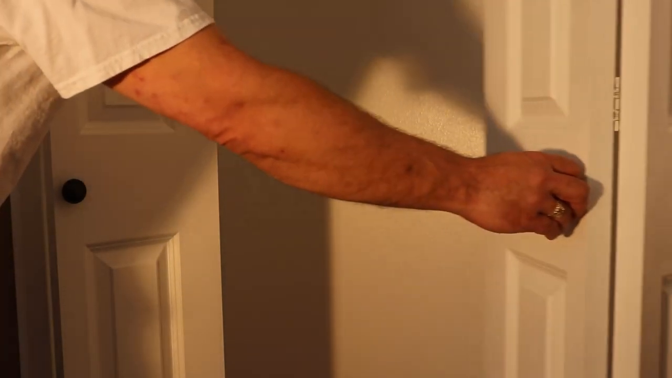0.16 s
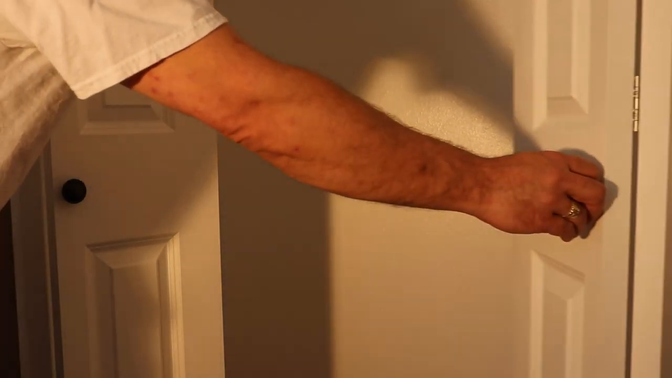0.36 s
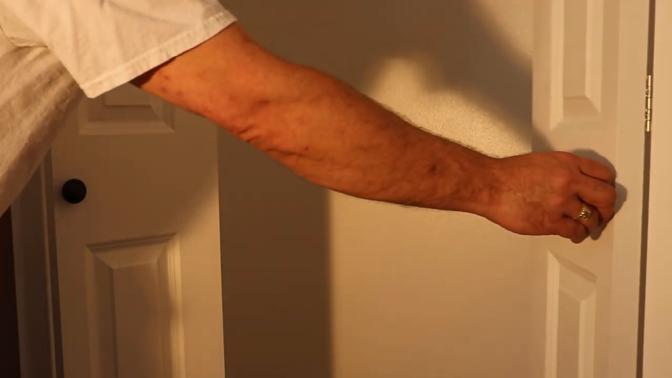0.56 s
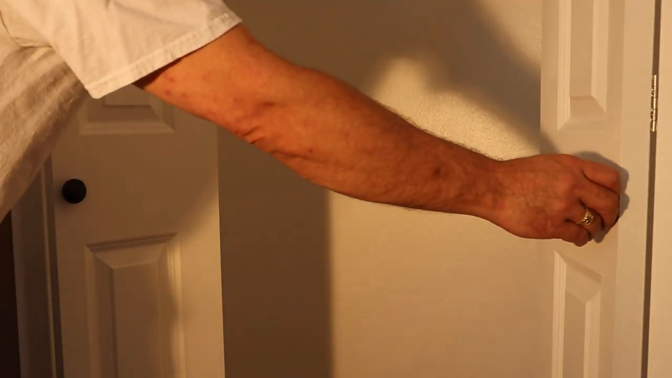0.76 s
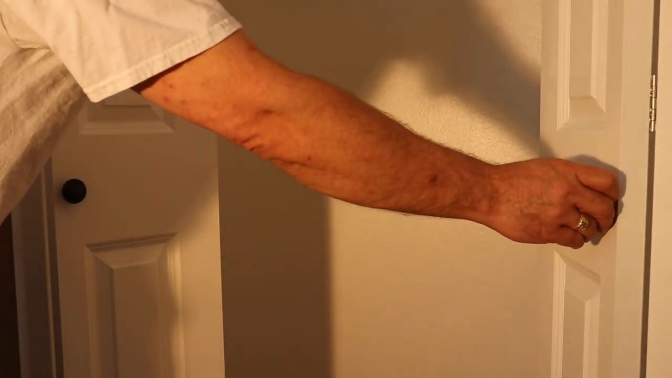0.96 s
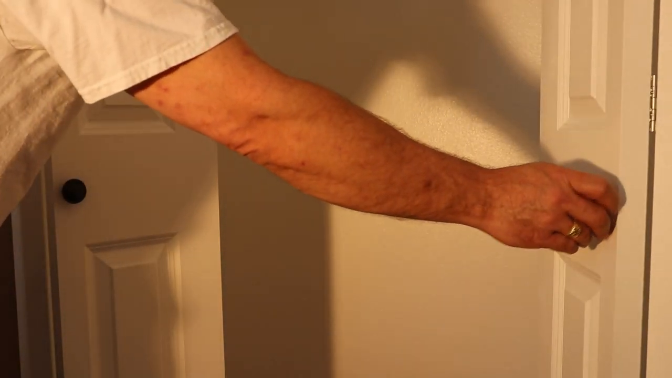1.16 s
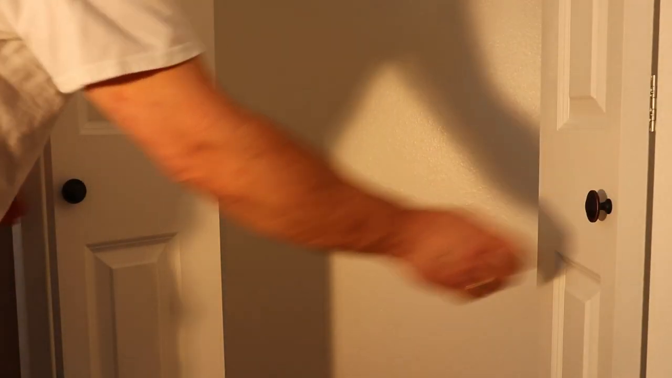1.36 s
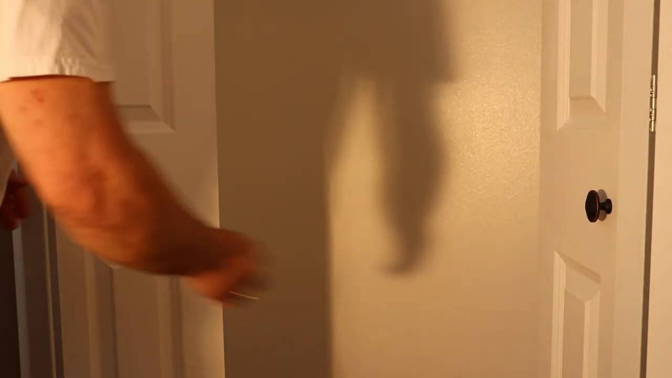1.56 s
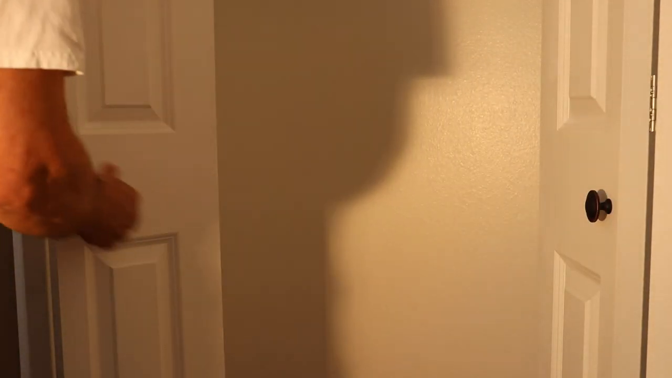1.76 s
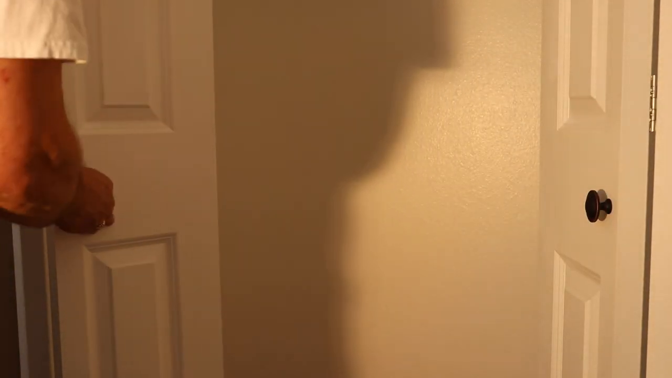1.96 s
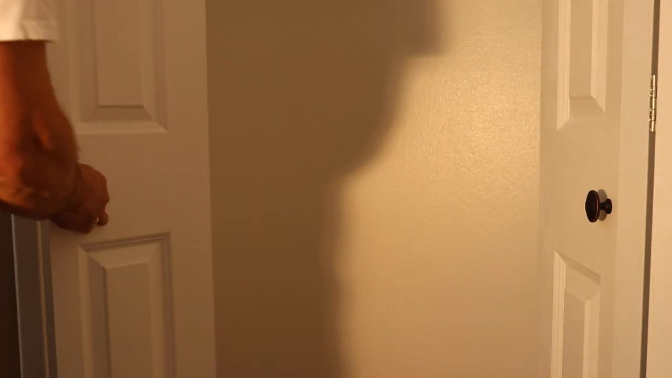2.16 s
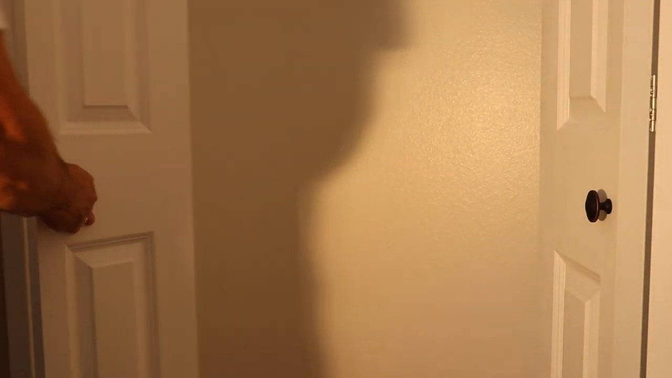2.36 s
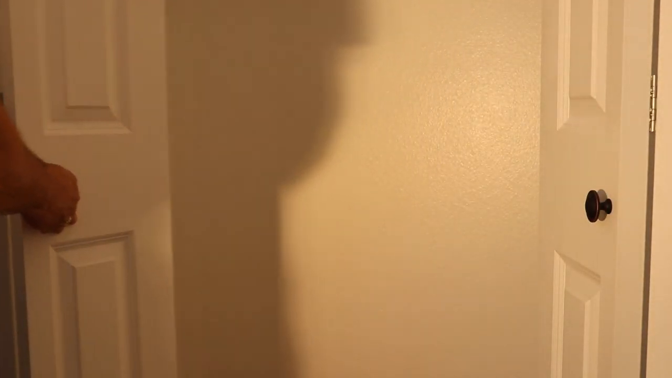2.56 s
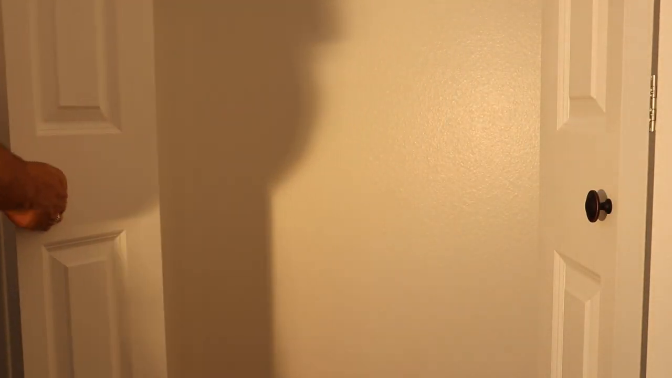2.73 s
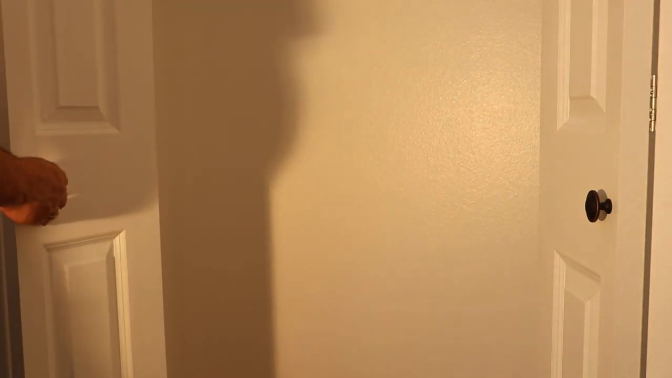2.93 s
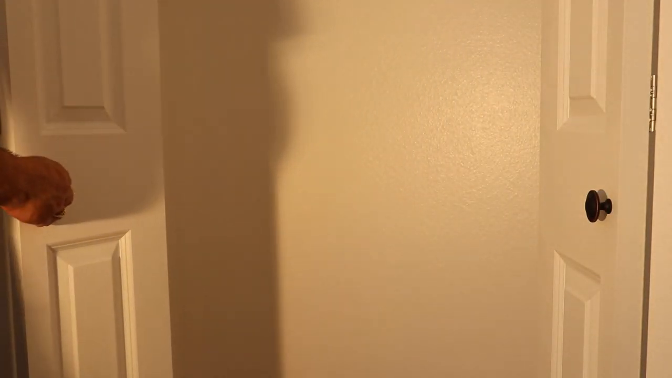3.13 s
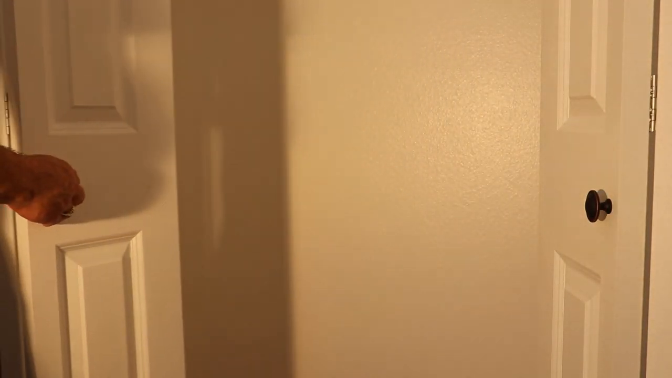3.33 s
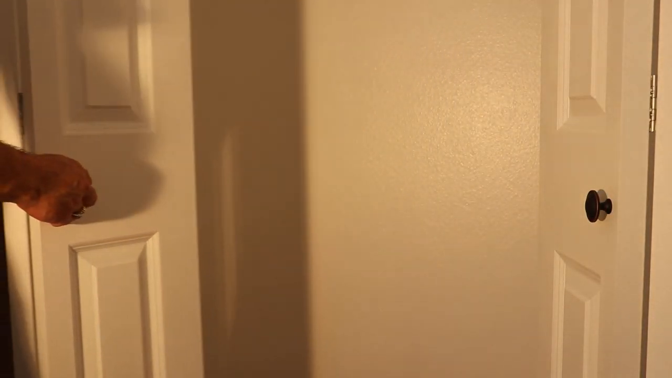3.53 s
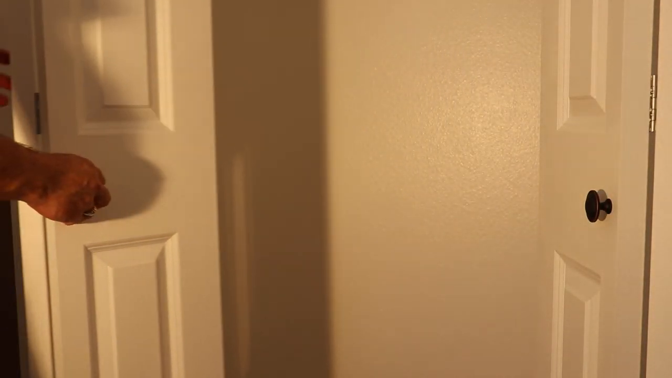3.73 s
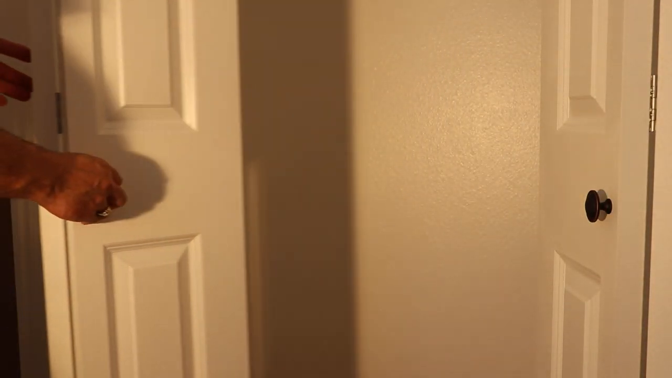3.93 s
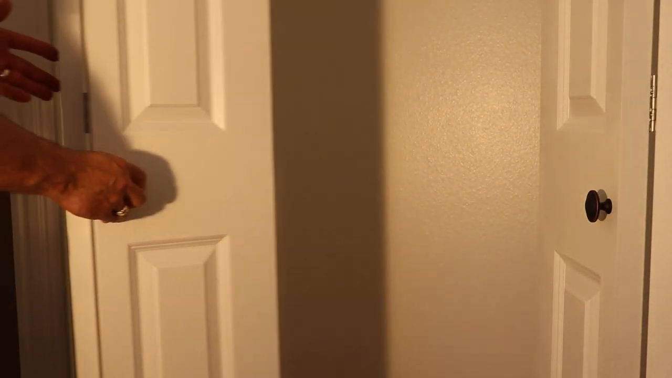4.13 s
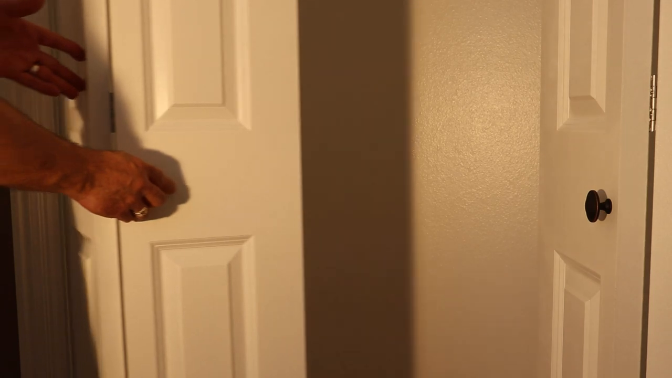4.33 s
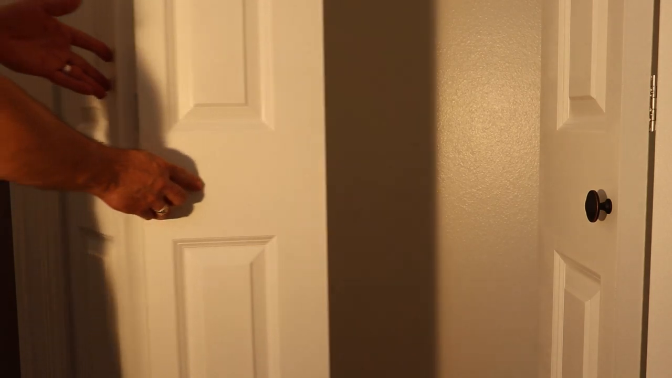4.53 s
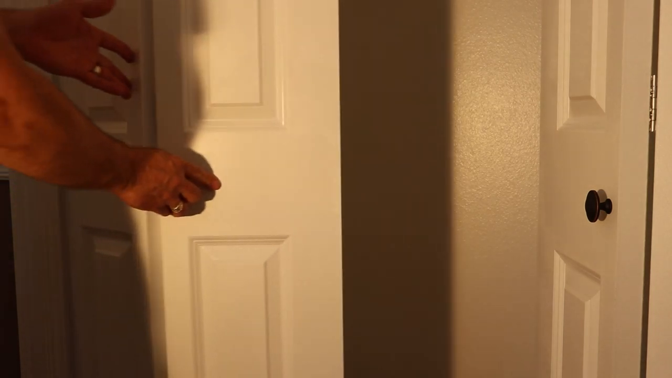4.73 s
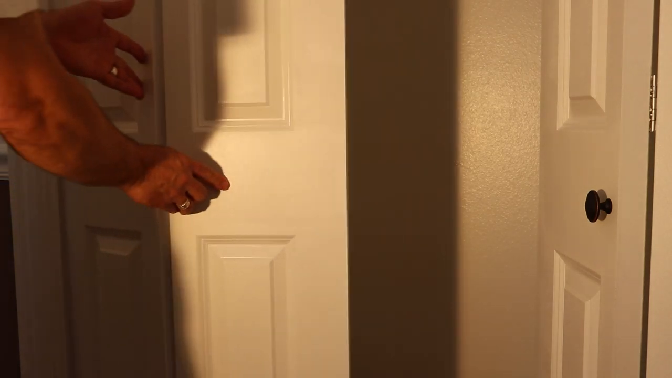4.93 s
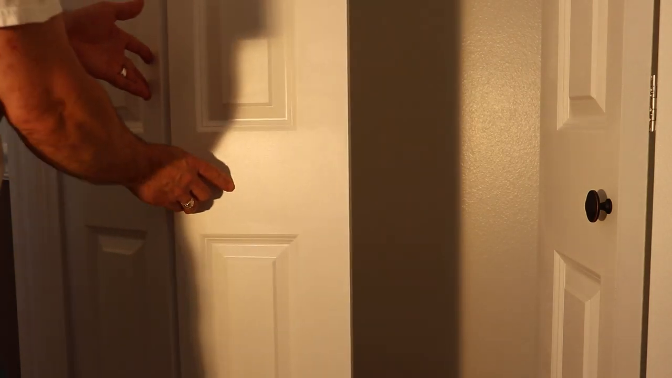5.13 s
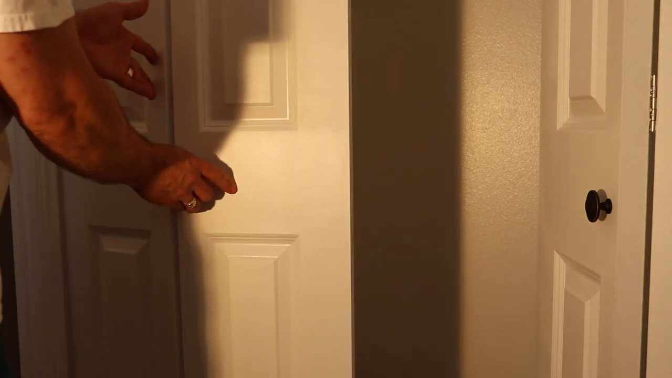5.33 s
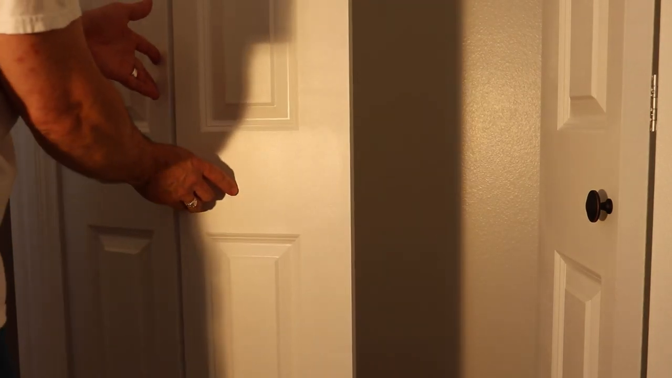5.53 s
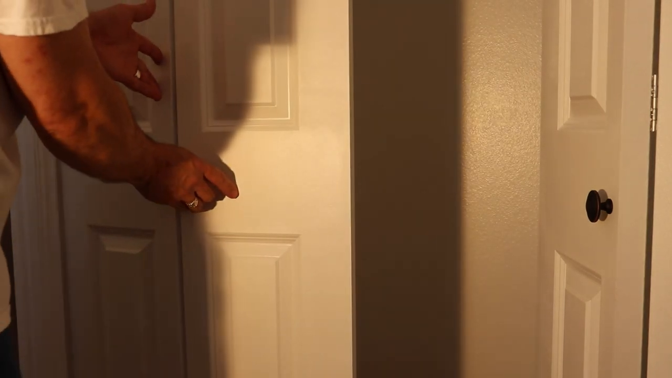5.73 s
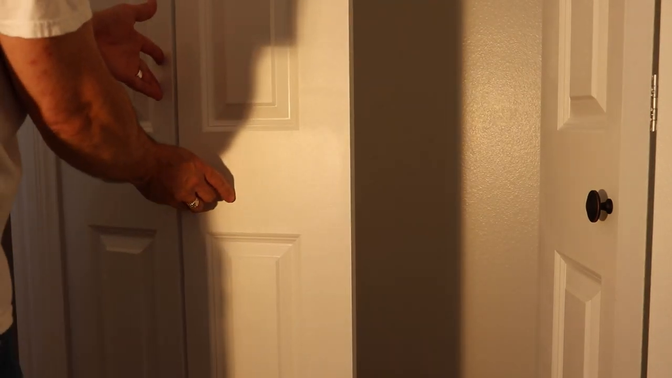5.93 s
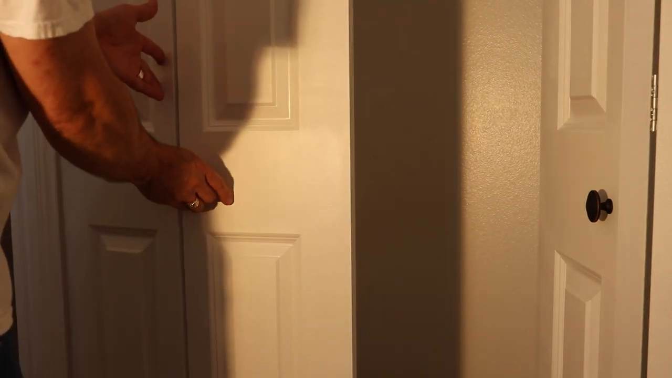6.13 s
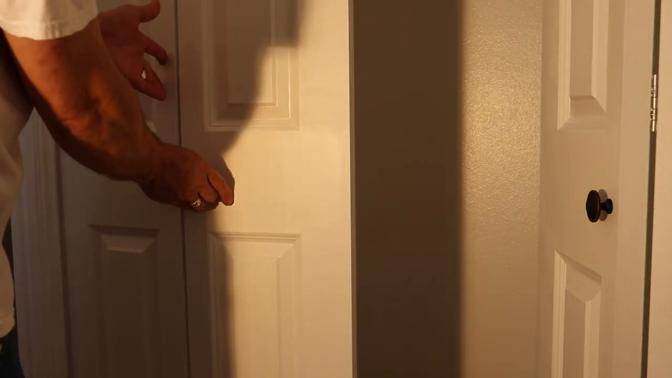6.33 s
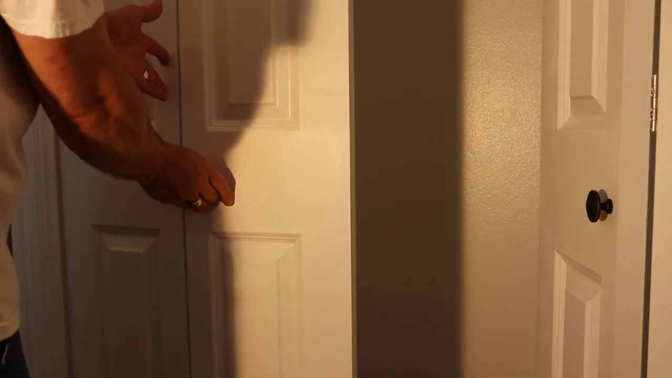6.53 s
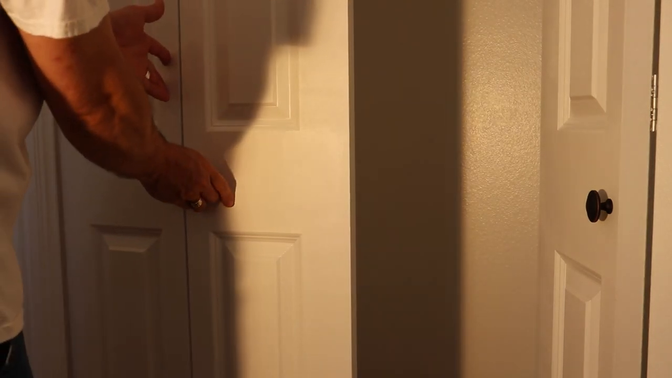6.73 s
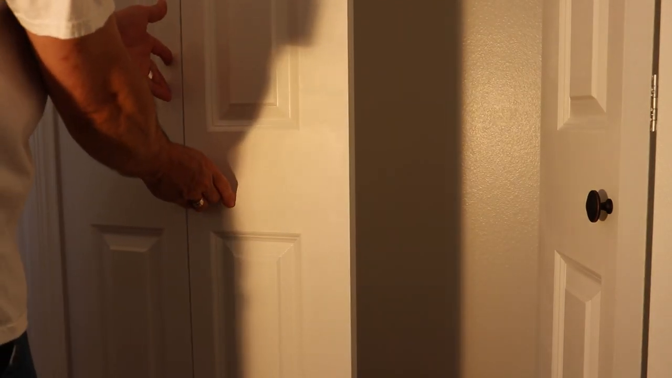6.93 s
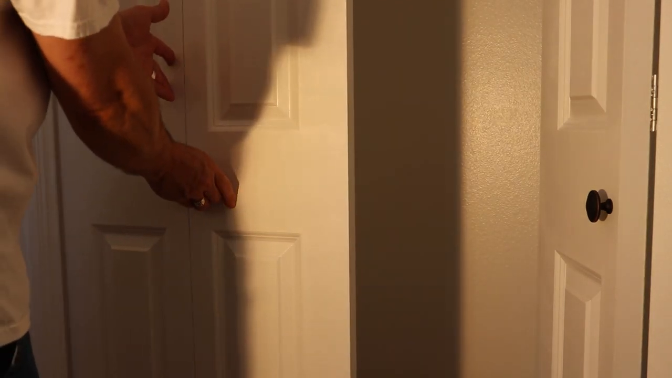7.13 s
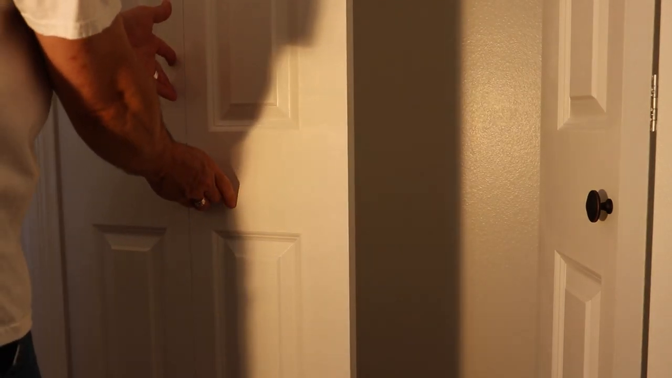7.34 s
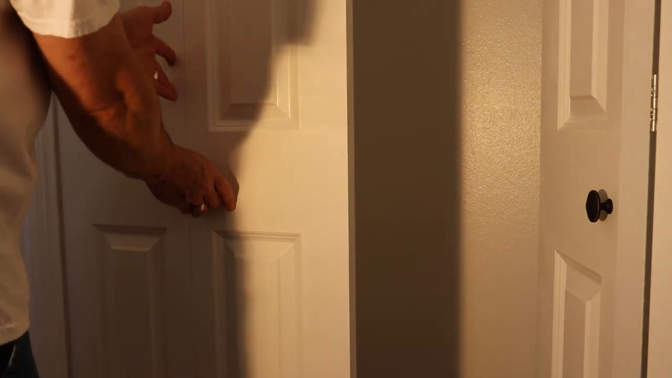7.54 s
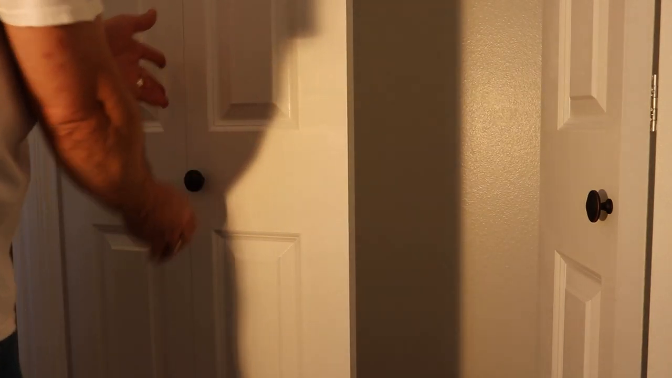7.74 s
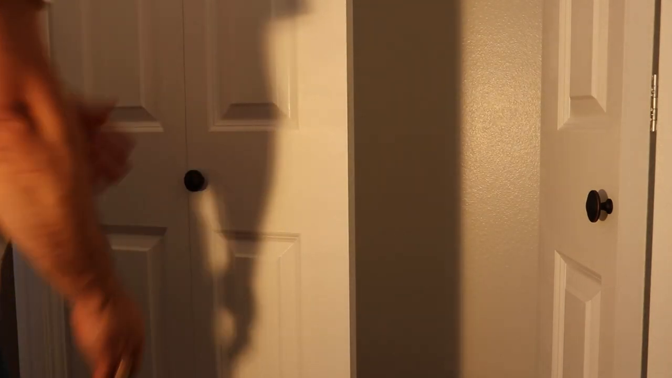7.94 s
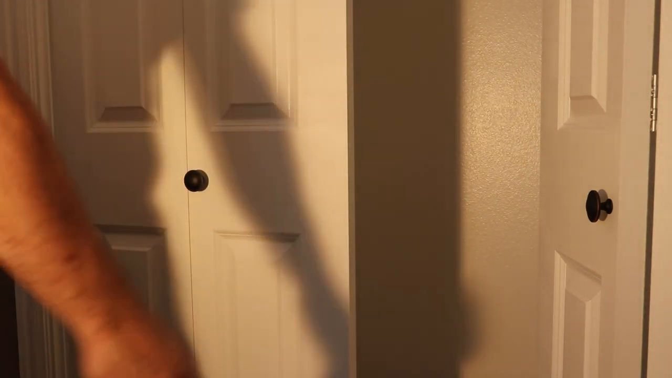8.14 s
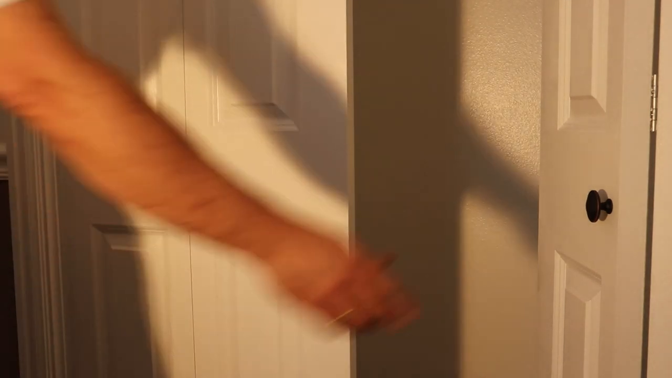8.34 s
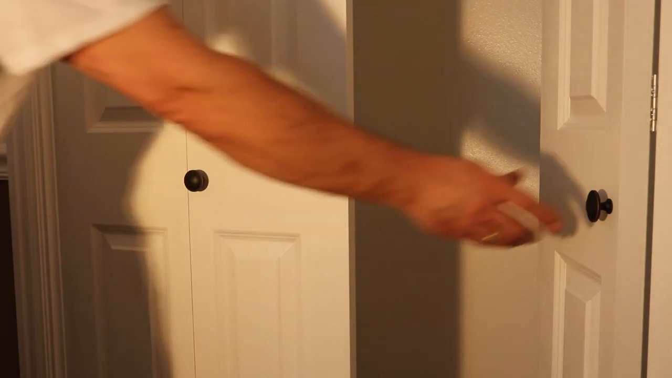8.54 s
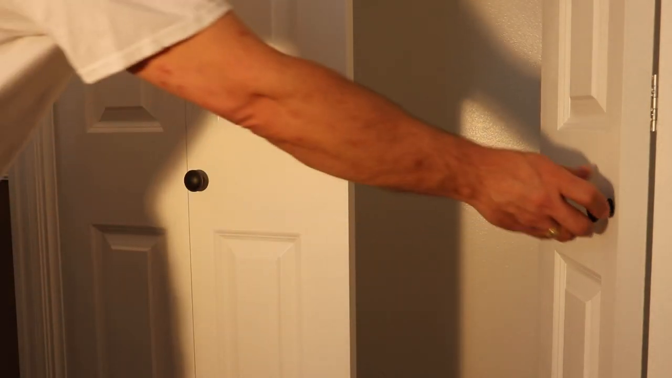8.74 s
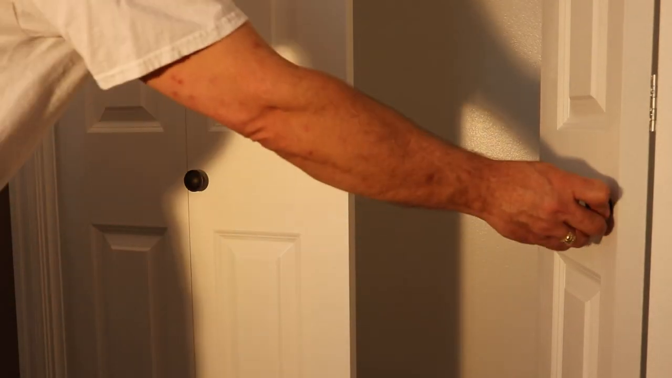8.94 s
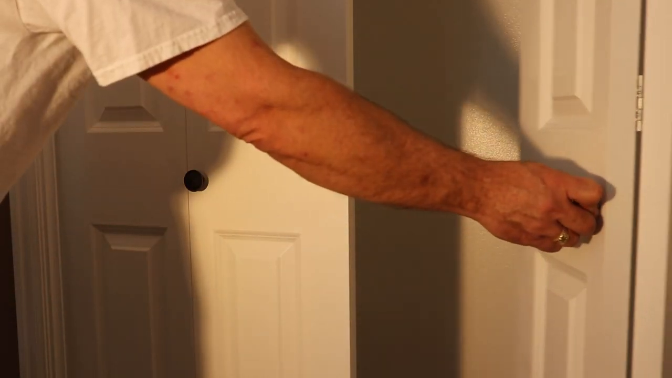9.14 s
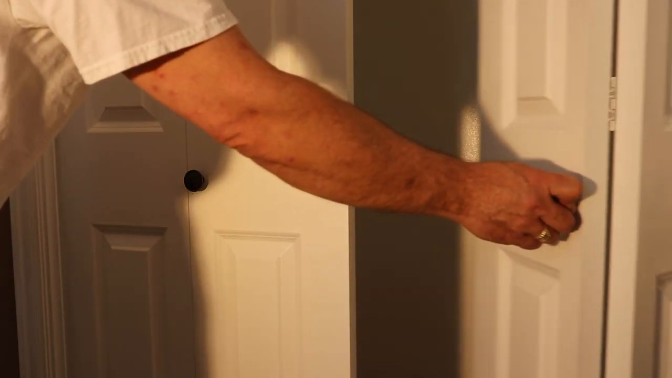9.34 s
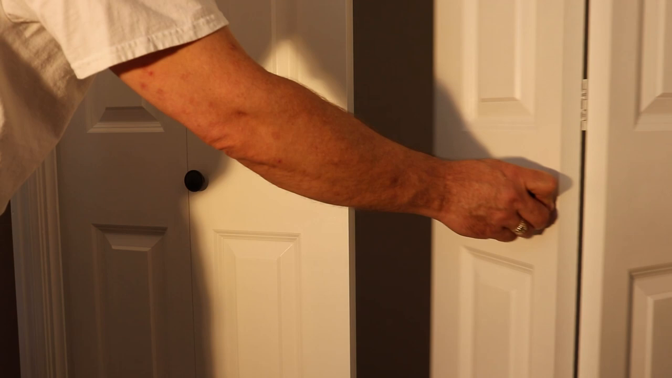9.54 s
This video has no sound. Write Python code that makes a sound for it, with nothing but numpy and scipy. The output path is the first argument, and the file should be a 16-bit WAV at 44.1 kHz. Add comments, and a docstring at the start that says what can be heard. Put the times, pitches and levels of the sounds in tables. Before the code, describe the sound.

In a small, slightly echoing room, folding closet doors are pulled open and pushed shut, their hollow panels shuddering as the guide pin scrapes the track. Knobs and pivots click, the panels knock hard twice, and a hinge gives a few short creaks. The rumble swells to its loudest near the end, with several thumps. The doors sit left of centre, with faint steady hiss behind them.

```python
"""Hollow folding closet doors are pulled along their track in a small bare room, left of centre.
From the start, over microphone hiss, the guide pin drags by stick-slip friction and shakes the panels.
Panels and stops knock, hardest near 2.8 and 4.7 s, amid ticks of knob and pivots and rattles of the pin.
From 5.4 s a hinge creaks; after 9 s the doors boom loudest, under a last run of knocks.
Throughout, the sound of the doors rings on in the room's reverberation."""
import sys
import numpy as np
from scipy import signal
from scipy.fft import rfft, irfft, next_fast_len
from scipy.io import wavfile
from scipy.ndimage import uniform_filter1d

SR = 44100
rng = np.random.default_rng(int(sys.argv[2]) if len(sys.argv) > 2 else 0)


def materialize(psi):
    """Save the field psi as 16-bit PCM at rate SR to the path in sys.argv[1].

    A 1-D psi becomes a single channel; in a 2-D psi each row is a channel.
    """
    bounded = np.clip(np.atleast_2d(psi).T, -1, 1)
    quanta = np.round(bounded * 32767).astype(np.int16)
    wavfile.write(sys.argv[1], SR, quanta)


N = 422919

# normal modes of the hollow door leaf: mode_hz, level_db, t60_s
LEAF_MODES = [(54.4, -30, .6), (90.08, 5, 0.6), (138.9, -3, 0.33), (207, -9, 0.87), (258.4, -2, 0.44),
              (293.7, 7.5, 0.12), (342, 6, 0.034), (414, -32, 0.46), (494, -6, 0.2), (583, -29, 0.44),
              (610, -9, 0.11), (650, -38, 0.4), (706, 8, 0.056), (728, 5, 0.43), (837, -6.5, 0.18),
              (972, 6, 0.15), (1035, -1, 0.041), (1140, -11, 0.028), (1350, -38, 0.033), (1571, -5, 0.086),
              (1745, 6, 0.032), (1950, -19, 0.12)]
# bands of an impact, the thud first: low_hz, high_hz
IMPACT_BANDS_HZ = [(60, 200), (200, 600), (600, 1000), (1000, 1400), (1400, 1800), (1800, 3500),
                   (3500, 6800), (6800, 12000)]
# spectrum of a metal contact, by band above the thud: level_db
METAL_COLOUR_DB = [-16, -14, -13, -15, -6, 0.06, -1]


def amp(db):
    """Amplitude ratio of a level in decibels."""
    return 10 ** (np.asarray(db) / 20)


def rms_one(x):
    """Normalisation to rms 1."""
    return x / np.sqrt(np.mean(x ** 2) + 1e-20)


def at_hz(points, hz):
    """Interpolation of (frequency_hz, value) points on a log-frequency axis."""
    points_hz, values = np.transpose(points)
    return np.interp(np.log(np.maximum(hz, 1)), np.log(points_hz), values)


def sides(pan_db):
    """Level difference between channels: left and right gains, positive to the left."""
    return amp([[pan_db / 2], [-pan_db / 2]])


def coloured(x, spectrum):
    """Filtering by a spectral envelope of (frequency_hz, gain_db); rms 1."""
    size = next_fast_len(N)
    gain = amp(at_hz(spectrum, np.fft.rfftfreq(size, 1 / SR)))
    return rms_one(irfft(rfft(x, size) * gain, size)[..., :N])


def resonate(x, hz, t60):
    """Damped oscillator: a unit impulse starts a decaying sine of height 1."""
    radius, angle = amp(-60 / (t60 * SR)), 2 * np.pi * hz / SR
    return signal.lfilter([0, np.sin(angle)], [1, -2 * radius * np.cos(angle), radius ** 2], x + 1e-18)


def peaks(x, resonances):
    """Parallel band-pass resonators of alternating polarity."""
    out = 0
    for k, (hz, width_hz, level_db) in enumerate(resonances):
        radius = np.exp(-np.pi * width_hz / SR)
        numerator = (1 - radius ** 2) / 2 * np.array([1, 0, -1])
        denominator = [1, -2 * radius * np.cos(2 * np.pi * hz / SR), radius ** 2]
        out = out + (-1) ** k * amp(level_db) * signal.lfilter(numerator, denominator, x)
    return out


def friction(per_s, spread_db):
    """Stick-slip friction as a Poisson train of uneven impulses; rms 1."""
    sizes = amp(spread_db * np.minimum(rng.exponential(1, N), 5)) * rng.choice([-1, 1], N)
    return rms_one(sizes * (rng.random(N) < per_s / SR))


def stereo_bands(length, coherence, shape):
    """Partially coherent stereo noise in half-octave bands, each scaled by shape(hz)."""
    out, edges_hz = 0, 22 * 2 ** np.append(np.arange(0, 9.6, .5), 9.9)
    white = rng.standard_normal((2, 2, length))
    for k, (low, high) in enumerate(zip(edges_hz, edges_hz[1:])):
        band = signal.butter(2, [low, high], "band", fs=SR, output="sos")
        mid, side = signal.sosfilt(band, white[k % 2])
        hz = np.sqrt(low * high)
        alike = np.clip(at_hz(coherence, hz), 0, 1)
        out = out + shape(hz) * (np.sqrt(1 + alike) * mid + np.sqrt(1 - alike) * side * [[1], [-1]])
    return out


def hiss(level_db=-57):
    """Stationary noise floor: room tone and microphone self-noise, louder on the left."""
    # noise spectrum: frequency_hz, density_db
    spectrum = [(15, -36), (25, -20), (64, 10), (86, -8.5), (136, -10), (193, -25), (260, -10), (378, -9),
                (762, -15), (1110, -16), (1800, -18), (6380, -21.5), (15500, -23.5)]
    # likeness of left and right: frequency_hz, coherence
    coherence = [(40, .9), (120, .8), (400, .3), (1500, .1)]
    # excess of left over right: frequency_hz, pan_db
    balance = [(60, 6.5), (240, 1.5), (950, 7), (3770, 1.5), (15000, 1)]
    noise = stereo_bands(N, coherence, lambda hz: amp(at_hz(spectrum, hz)) * sides(at_hz(balance, hz)))
    return amp(level_db) * rms_one(noise)


def room(x, first_echo_s=0.0014, early_db=6.0, early_s=0.017):
    """Reverberation: strong early reflections, then a diffuse field decaying band by band."""
    # reverberation time: frequency_hz, t60_s
    decay = [(60, 1), (160, 0.38), (420, 0.51), (1100, 0.46), (2910, 0.43), (7680, 0.5)]
    # likeness of the echoes left and right: frequency_hz, coherence
    coherence = [(60, .97), (180, .85), (550, .55), (1650, .4), (5000, .3), (15000, .1)]
    # what closet and room give back: frequency_hz, gain_db
    response = [(60, -8), (130, -8.5), (260, -6), (345, -4), (620, -5), (1000, -3.5), (1270, -6.5),
                (1560, -5.5), (2100, 2.5), (3200, -2.5), (5500, -2), (8000, -4.5), (12000, -10)]
    t = np.arange(SR) / SR
    tail = stereo_bands(SR, coherence, lambda hz: amp(-60 * t / at_hz(decay, hz)))
    onset = np.clip(t / first_echo_s - 1, 0, 1)
    spectrum = rfft(tail * onset * amp(early_db * np.exp(-t / early_s)))
    local_rms = np.sqrt(uniform_filter1d(np.abs(spectrum) ** 2, size=70) + 1e-12)
    spectrum /= local_rms  # many overlapping modes even out
    tail = irfft(spectrum * amp(at_hz(response, np.fft.rfftfreq(SR, 1 / SR))), SR)
    return signal.fftconvolve(x, tail[:, :SR * 3 // 4], axes=1)[:, :N]


def track_rub():
    """Friction noise, filtered twice by the track's resonances, swells briefly near the start."""
    # track resonances: centre_hz, width_hz, level_db
    resonances = [(2260, 330, 0.1), (4320, 700, 0.79), (4930, 580, -1.3)]
    envelope = np.interp(np.arange(N) / SR, [0.35, 0.45, 0.77, 0.87], [0, 1, 1, 0])
    rub = rms_one(peaks(peaks(rng.standard_normal(N), resonances), resonances))
    return amp(-59) * envelope * rub * sides(7.2)


def pin_drag():
    """Forced vibration: catches of the pin drive the leaf's low modes, its thin skins and a scrape."""
    # the doors in motion: time_s, boom_db, shudder_db, scrape_db
    motion = [(0.0, -44, -35, -43.5), (0.24, -41.5, -56.5, -52.5), (0.45, -43, -44.5, -53),
              (0.8, -51.5, -48, -53.5), (1.0, -55, -57.5, -87), (1.3, -43, -60.5, -76),
              (1.5, -72, -60.5, -62), (1.9, -66, -57.5, -60.5), (2.06, -55, -38, -59.5),
              (2.2, -46.5, -56, -53.5), (2.62, -50, -47.5, -55.5), (2.8, -53, -35, -45.5),
              (3.1, -50, -58.5, -61), (3.4, -44.5, -49.5, -56.5), (3.92, -42, -47, -56.5),
              (4.15, -36, -40.5, -48.5), (4.4, -42.5, -48.5, -53.5), (5.05, -45, -49, -63),
              (5.25, -51, -59, -66), (5.8, -52.5, -54, -61), (6.06, -70, -63, -76), (6.75, -57.5, -56, -61),
              (7.2, -64, -59.5, -84), (7.5, -53, -64, -74), (7.66, -48, -48.5, -56),
              (7.85, -56, -57.5, -56), (8.14, -51, -50, -49.5), (8.45, -68, -62, -62),
              (8.75, -59, -56, -58), (9.0, -46, -51, -62.5), (9.17, -46, -39.5, -53),
              (9.22, -35, -38, -48.5), (9.4, -28.5, -35.5, -49), (9.59, -32, -38.5, -52.5)]
    # spectrum of the shaking skins: frequency_hz, density_db
    shudder_spectrum = [(65, -16.5), (110, -8.5), (174, -3.5), (451, -8.5), (494, -10), (761, -15),
                        (834, -13.5), (2500, -49), (3250, -47), (5500, -120)]
    # spectrum of the scrape of pin and hand: frequency_hz, density_db
    scrape_spectrum = [(530, 1), (900, 6), (1170, 9), (1580, 1), (2530, -5.5), (3570, -2.5), (5400, -5.5),
                       (8640, -14.5), (14000, -25)]
    times_s, *curves_db = np.transpose(motion)
    boom_db, shudder_db, scrape_db = [
        np.interp(np.arange(N) / SR, times_s, curve, right=-150) for curve in curves_db]
    catches = friction(per_s=610, spread_db=1)
    boom = sum(amp(db) * resonate(catches, hz, t60 * 0.92) for hz, db, t60 in LEAF_MODES[:3])
    catches = friction(per_s=1300, spread_db=4)
    skins = sum(rms_one(resonate(catches, hz, t60 * 0.17)) for hz, _, t60 in LEAF_MODES[2:])
    shudder = coloured(0.24 * rms_one(skins) + catches, shudder_spectrum)
    scrape = coloured(friction(per_s=6000, spread_db=2), scrape_spectrum)
    return (amp(boom_db) * rms_one(boom) * sides(3.1) + amp(shudder_db) * shudder * sides(9.1)
            + amp(scrape_db) * scrape * sides(7.6))


def hinge_creak(slip_decay_s=0.02, falloff_db_per_octave=13):
    """Stick-slip excitation: each slip is a short chatter that drives the resonances near its pitch."""
    # slips of the hinge: start_s, level_db, pitch_hz
    slips = [(5.426, -48.5, 2760), (5.485, -52.5, 1910), (5.5405, -49, 1100), (5.595, -52, 1950),
             (5.654, -49.5, 1960), (5.757, -48, 3040), (5.7807, -57, 2040), (5.8749, -42.5, 1000),
             (6.4161, -57, 1090), (8.1237, -42, 4100)]
    # hinge resonances: centre_hz, width_hz, level_db
    resonances = [(700, 62, -16), (1000, 59, 2), (1090, 35, 2.5), (1960, 140, 1.5), (2680, 140, -2.5),
                  (3040, 74, -5.5), (3800, 31, -2.5)]
    out, t = np.zeros(N), np.arange(N) / SR
    chatter = friction(per_s=2000, spread_db=6)
    voices = [(hz, amp(db) * rms_one(peaks(chatter, [(hz, width, 0)]))) for hz, width, db in resonances]
    for start_s, level_db, pitch_hz in slips:
        span = slice(round(start_s * SR), round((start_s + .2) * SR))
        tone = sum(voice[span] * amp(-falloff_db_per_octave * abs(np.log2(hz / pitch_hz)))
                   for hz, voice in voices)
        out[span] += amp(level_db - 8) * tone * np.exp(-(t[span] - start_s) / slip_decay_s)
    return out * sides(8.2)


def impact_spectrum(level_db, tilt_db, thud_db, colour_db, pivot_hz, top_db=0):
    """Spectral envelope of a blow: the thud, then the material's colour tilted per octave."""
    octaves = np.log2(np.sqrt(np.prod(IMPACT_BANDS_HZ[1:], axis=1)) / pivot_hz)
    *bands_db, last_db = level_db + np.array(colour_db) + tilt_db * octaves
    return [thud_db, *bands_db, last_db + top_db]


def impacts(blows, crack_db, leaf_db, click_gain, pan_db):
    """Impact excitation: a click and contact noise, and ringing leaf modes; returns direct, room feed."""
    def pan(hz):
        """Diffraction: long waves pass round the microphones, so bass lies nearer the centre."""
        return sides(pan_db * (0.26 if hz < 200 else 1))

    size = SR // 20
    t = np.arange(size) / SR
    noises = rng.standard_normal((len(blows), size))
    spots_db = rng.normal(0, 0.63, (len(blows), len(LEAF_MODES)))  # no two blows land on the same spot
    polarities = rng.choice([-1, 1], spots_db.shape)
    centres_hz = np.sqrt(np.prod(IMPACT_BANDS_HZ, axis=1))
    crack, feed = np.zeros((2, 2, N + size))
    forces = np.zeros((len(LEAF_MODES), N + size))
    filters = [signal.butter(3, band, "band", fs=SR, output="sos") for band in IMPACT_BANDS_HZ]
    clicks = [signal.sosfilt(sos, 1.0 * (t == 0)) for sos in filters]
    for blow, noise, spot_db, signs in zip(blows, noises, spots_db, polarities):
        start_s, bands_db, room_db, contact_s = blow
        span = slice(round(start_s * SR), round(start_s * SR) + size)
        for sos, click, hz, level_db, sign in zip(filters, clicks, centres_hz, bands_db, signs):
            age = t / contact_s * (hz / 1000) ** 0.43  # the bass lasts longer
            burst = signal.sosfilt(sos, noise * age * np.exp(-age)) + click_gain * click
            gain = amp(level_db + crack_db) * pan(hz)
            crack[:, span] += gain * burst / np.abs(burst).max()
            feed[:, span] += sign * gain * amp(room_db) * click / np.abs(click).max()
        swell = t * np.exp(-t / contact_s)  # the leaf takes up the blow over the contact time
        spectrum = list(zip(centres_hz, bands_db))
        for k, (hz, level_db, _) in enumerate(LEAF_MODES):
            strength = amp(at_hz(spectrum, hz) + level_db + spot_db[k] + leaf_db)
            forces[k, span] += signs[k] * strength * swell / swell.sum() * np.cos(2 * np.pi * hz * t)
    rings = sum(resonate(force, hz, t60) * pan(hz) for force, (hz, _, t60) in zip(forces, LEAF_MODES))
    return (crack + rings)[:, :N], (feed + amp(-11) * rings)[:, :N]


def hardware_ticks(ring_t60_s=0.009, contact_s=0.0011):
    """Free vibration of small metal parts after impact; returns direct ticks, room feed and ringing."""
    # ticks of knob, pivots and hinges:
    # start_s, level_db, tilt_db_per_octave, top_band_db, room_db, ring_hz, ring_db
    ticks = [(1.481, -35, 0.5, 5.5, -9.5, 5460, -40), (1.647, -51.5, -1, 2.5, -8, 1330, -44),
             (2.592, -36.5, -1.5, -25, 1, 2620, -27.5), (2.752, -59, 3, -9, -10, 1546, -13),
             (3.079, -52, -2.2, 10, -6.5, 1550, -57), (3.117, -61.5, -5.5, 0.1, -5.5, 2300, -46.5),
             (3.304, -41.5, -2.5, 1, -11, 5140, -43), (3.336, -40, -2, 1.5, -1.5, 3000, -49),
             (3.914, -43.5, 2, -8, -2, 4830, -38.5), (4.662, -46, -5, -3, -17, 1460, -25.5),
             (6.847, -58.5, 3, -5, 0, 2880, -58), (7.421, -44, 3, -12, -10, 2350, -44),
             (7.552, -39, 3.5, -2, -10.5, 4910, -45), (7.701, -36, 1.3, -8, -15, 5500, -44),
             (7.818, -60.5, -3.5, 14, 1, 8960, -50), (8.096, -54, -4, -1, -17, 3260, -45),
             (8.563, -48.5, 2, -6, 1.5, 2960, -38.5)]
    blows, ringing, t = [], np.zeros(N + SR), np.arange(SR // 4) / SR
    for start_s, level_db, tilt_db, top_db, room_db, ring_hz, ring_db in ticks:
        thud_db = level_db - 20
        bands_db = impact_spectrum(level_db, tilt_db, thud_db, METAL_COLOUR_DB, 5000, top_db)
        blows.append((start_s, bands_db, room_db, contact_s))
        phase = 2 * np.pi * ring_hz * t
        partials = np.sin(phase) + 0.38 * np.sin(2.04 * phase)
        at = round(start_s * SR)
        ringing[at:at + len(t)] += amp(ring_db - 60 * t / ring_t60_s) * partials
    direct, feed = impacts(blows, crack_db=4, leaf_db=-13, click_gain=0.53, pan_db=8)
    return direct, feed, ringing[:N] * sides(10.5)


def pin_rattles(touches=3, room_db=-4.5, contact_s=0.0014):
    """Repeated impact: the pin strikes the track a few times, uneven in timing and strength."""
    # rattles of the pin: start_s, level_db, tilt_db_per_octave, length_s
    rattles = [(4.184, -41.5, 0.5, 0.037), (4.24, -42.5, 3.5, 0.013), (4.288, -53, -1, 0.017),
               (4.477, -46.5, -1.5, .03), (4.531, -50, -3, .008), (5.896, -52, 2, 0.013),
               (6.214, -51.5, -1.7, .008), (7.639, -51, -3.5, 0.036), (8.042, -51, -3, .05),
               (8.475, -50.5, -0.5, 0.044), (9.197, -55, -4, .03), (9.288, -62, -5.5, 0.016),
               (9.36, -54, 1.0, 0.0052)]
    jitter = rng.uniform(-.4, .4, (len(rattles), touches))
    jitter[:, 0] = 0
    uneven_db = rng.normal(0, 4.9, jitter.shape)
    blows = []
    for (start_s, level_db, tilt_db, length_s), shifts, offsets_db in zip(rattles, jitter, uneven_db):
        times_s = start_s + length_s * (np.arange(touches) + shifts) / (touches - 1)
        for time_s, touch_db in zip(times_s, level_db + offsets_db):
            thud_db = touch_db - 8.5
            bands_db = impact_spectrum(touch_db, tilt_db, thud_db, METAL_COLOUR_DB, 4940, top_db=-3.5)
            blows.append((time_s, bands_db, room_db, contact_s))
    return impacts(blows, crack_db=3, leaf_db=-10.5, click_gain=0.51, pan_db=9)


def wood_knocks():
    """Modal response to impact: panels and stops collide and set the hollow leaf ringing."""
    # knocks of wood: start_s, level_db, tilt_db_per_octave, thud_db, room_db, contact_s
    knocks = [(0.114, -42.5, 0.5, -38.5, -4.5, 0.0075), (0.169, -40.5, -3.5, -49, -0.2, 0.0026),
              (0.999, -55, -7, -48.5, -0.3, 0.0023), (1.09, -54, -7, -48.5, 2.6, .002),
              (1.984, -50, 2, -43.5, 1.5, 0.0022), (2.75, -22, -2.5, -33.5, 0, 0.0029),
              (3.672, -63, 6.5, -44, 0, 0.0054), (4.699, -26, 0.5, -27.5, 0.7, 0.0024),
              (7.26, -55.5, -1.5, -54, -4.5, .003), (7.319, -60, -2, -48.5, -2, .003),
              (8.122, -65, -9, -41.5, 1.2, 0.0045), (8.789, -54, -1.5, -43, -2, 0.0013),
              (9.009, -44, -3, -48, 2.5, 0.0023), (9.198, -41.5, 2, -37, -5, 0.0019),
              (9.288, -48, 1, -36, 0, 0.0045), (9.364, -48.5, -3, -35, -3.8, .003),
              (9.45, -48, -2.5, -32.5, 3.3, 0.0013), (9.498, -41, -2.5, -28.5, -3.5, 0.0017)]
    # spectrum of a wooden contact, by band above the thud: level_db
    wood_colour_db = [-1.0, -3.5, -7.5, -9, -8, -9.5, -19]
    blows = []
    for start_s, level_db, tilt_db, thud_db, room_db, contact_s in knocks:
        bands_db = impact_spectrum(level_db, tilt_db, thud_db, wood_colour_db, pivot_hz=850)
        blows.append((start_s, bands_db, room_db, contact_s))
    return impacts(blows, crack_db=3, leaf_db=-4.5, click_gain=3.1, pan_db=9)


def scene():
    """Superposition of direct sound, reverberation and noise floor; impacts feed the room most."""
    knocks, knock_feed = wood_knocks()
    rattles, rattle_feed = pin_rattles()
    ticks, tick_feed, metal = hardware_ticks()
    creak = hinge_creak()
    sliding = pin_drag() + track_rub()
    impact_feed = knock_feed + rattle_feed + tick_feed
    echoes = room(amp(16.5) * impact_feed + amp(-3.5) * sliding + amp(4) * metal + amp(-0.5) * creak)
    return knocks + rattles + ticks + metal + creak + amp(-6) * sliding + echoes + hiss()


def record(dry, cutoff_hz=16150):
    """Phase difference between the two microphone ports, then a steep low-pass filter."""
    # phase offset of the ports: frequency_hz, left_lead_rad
    port_phase = [(20, 0.4), (340, 1.31), (1550, 1.53), (6720, 0.44), (9130, -1.8), (16300, -6)]
    size = next_fast_len(N + SR)
    lead_rad = at_hz(port_phase, np.fft.rfftfreq(size, 1 / SR))
    rotation = np.exp(.5j * lead_rad * np.array([[1], [-1]]))
    heard = irfft(rfft(dry, size) * rotation, size)[:, :N]
    return signal.sosfilt(signal.cheby2(14, 60, cutoff_hz, fs=SR, output="sos"), heard)


dry = scene()
out = record(dry)
materialize(out)
```